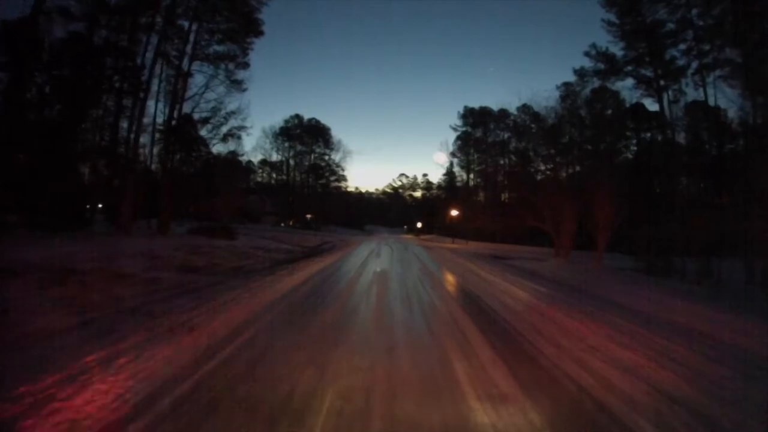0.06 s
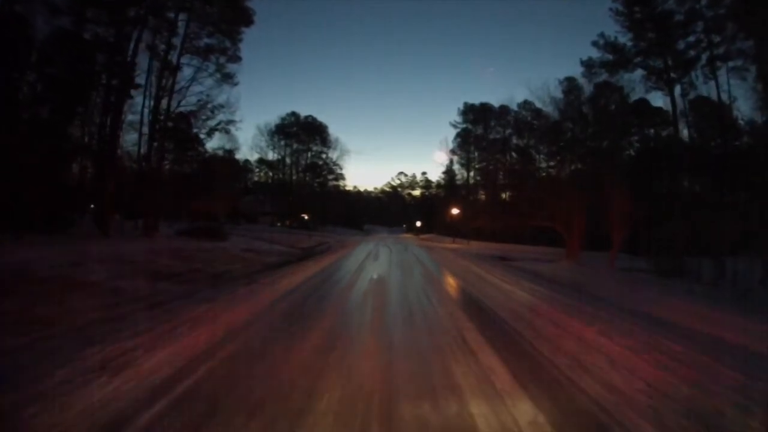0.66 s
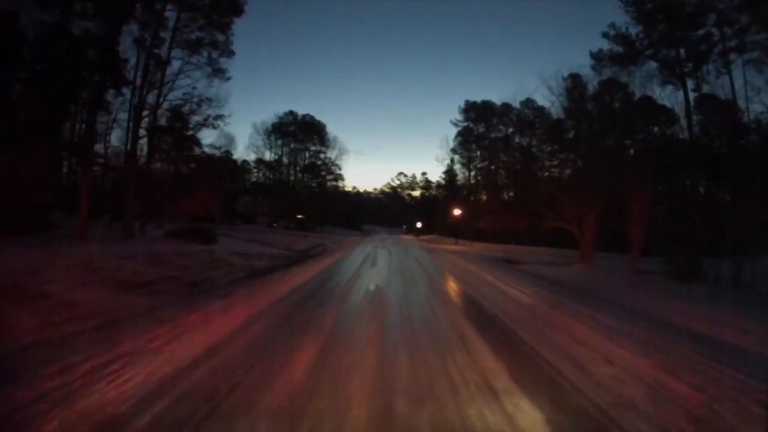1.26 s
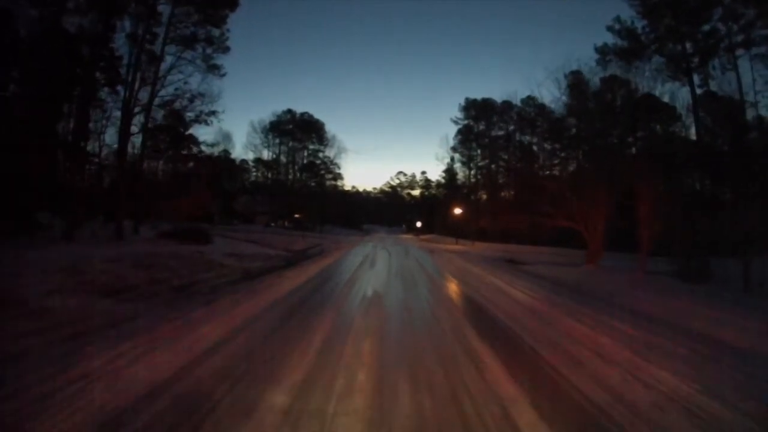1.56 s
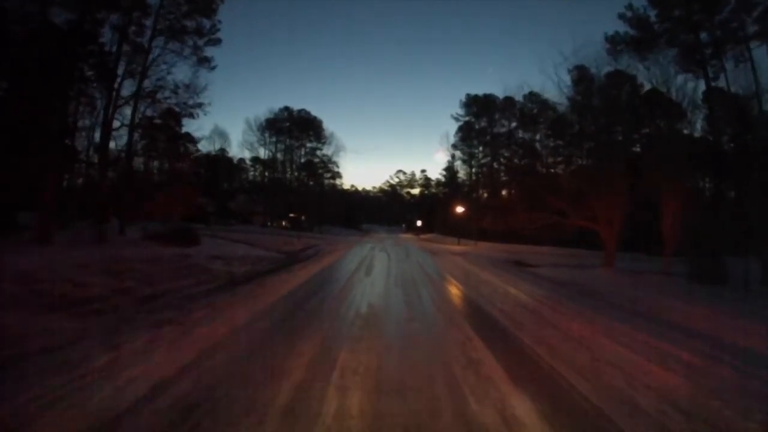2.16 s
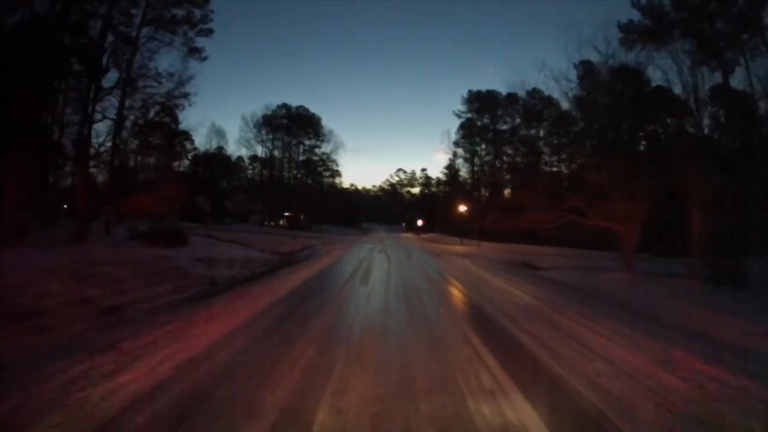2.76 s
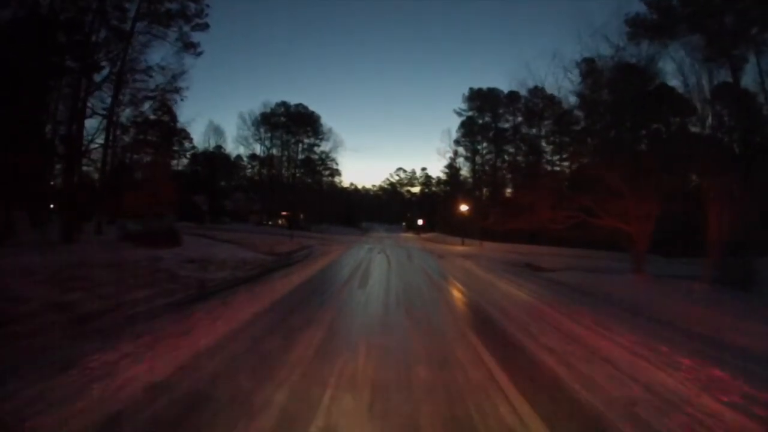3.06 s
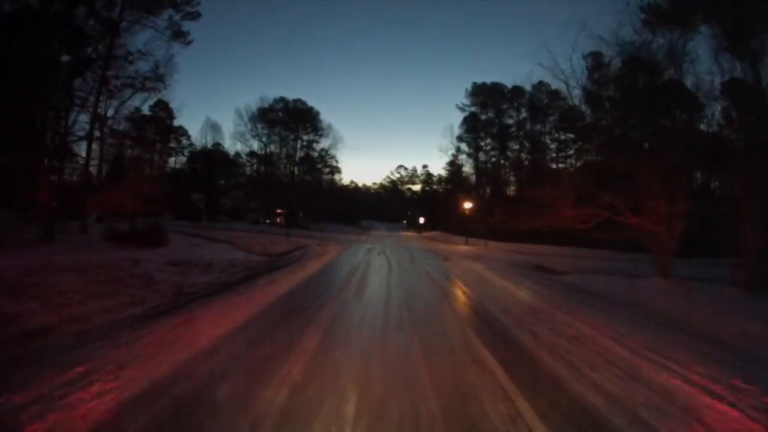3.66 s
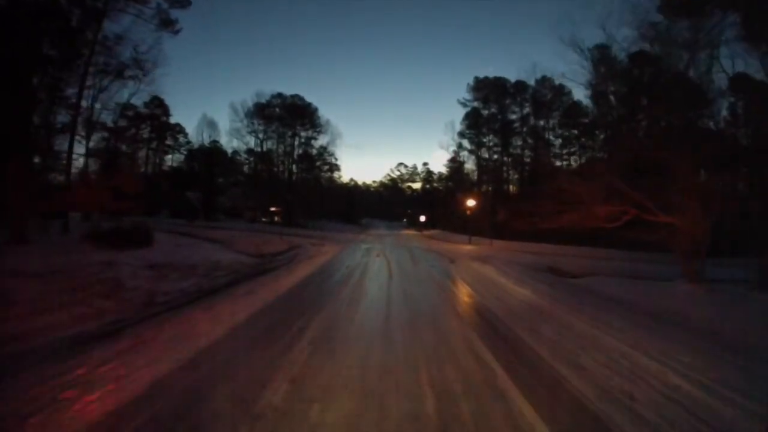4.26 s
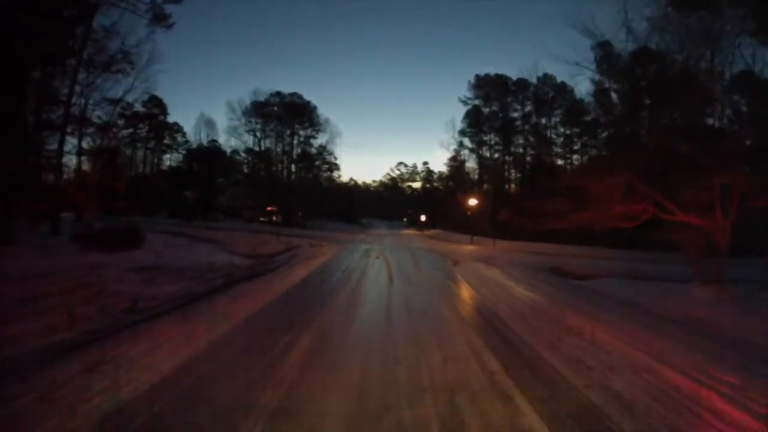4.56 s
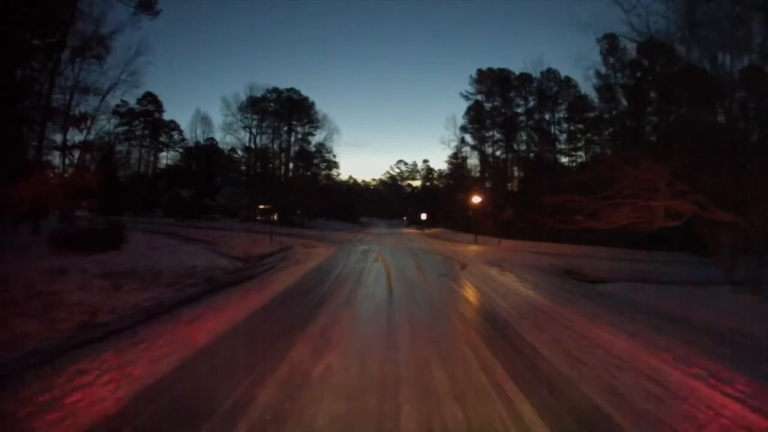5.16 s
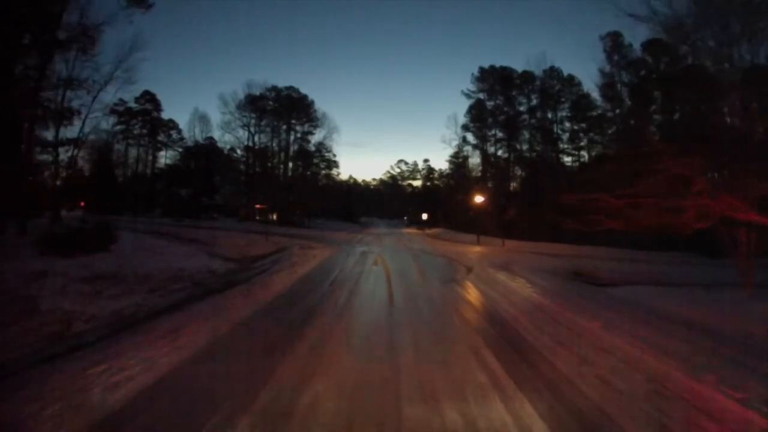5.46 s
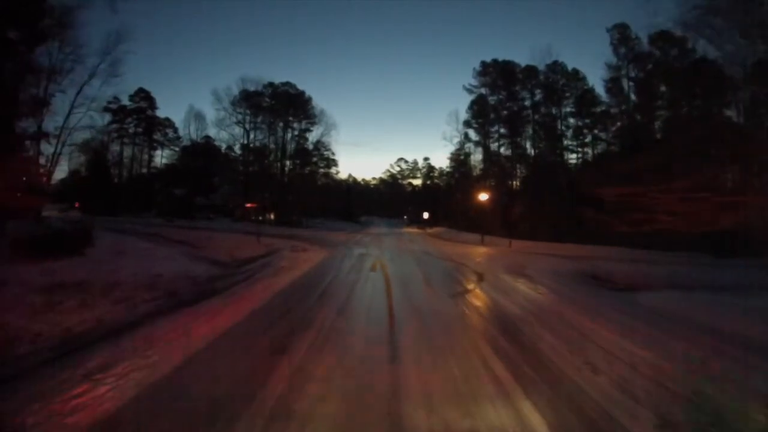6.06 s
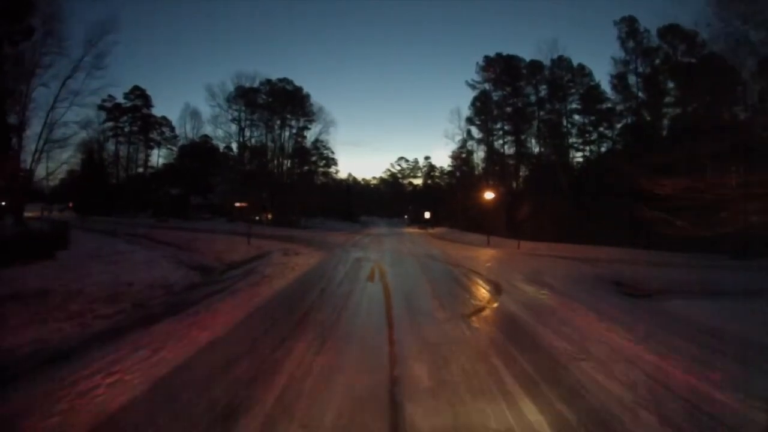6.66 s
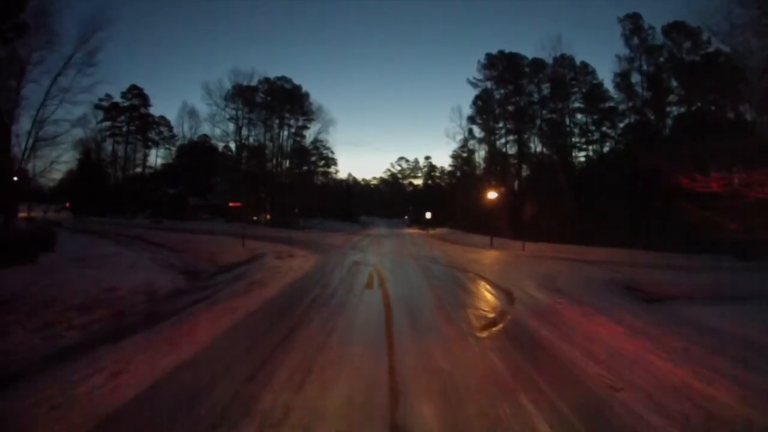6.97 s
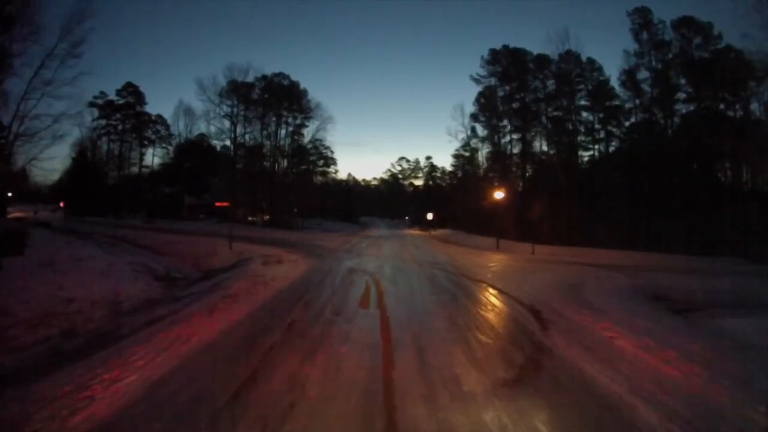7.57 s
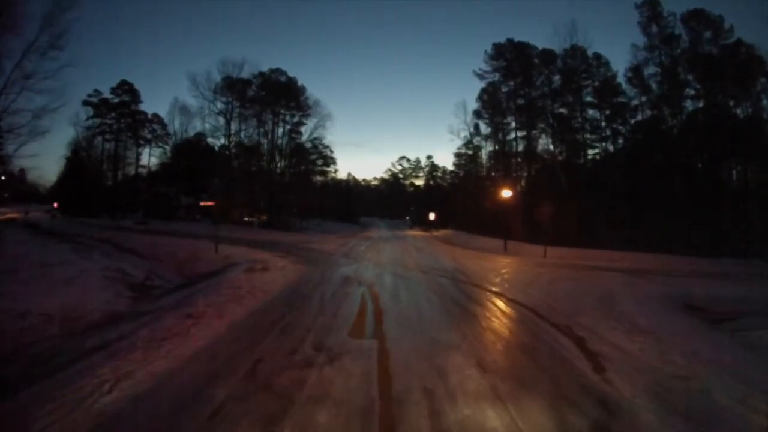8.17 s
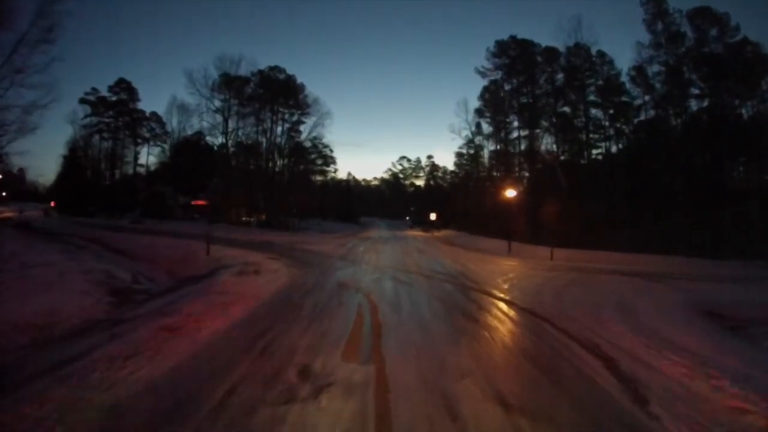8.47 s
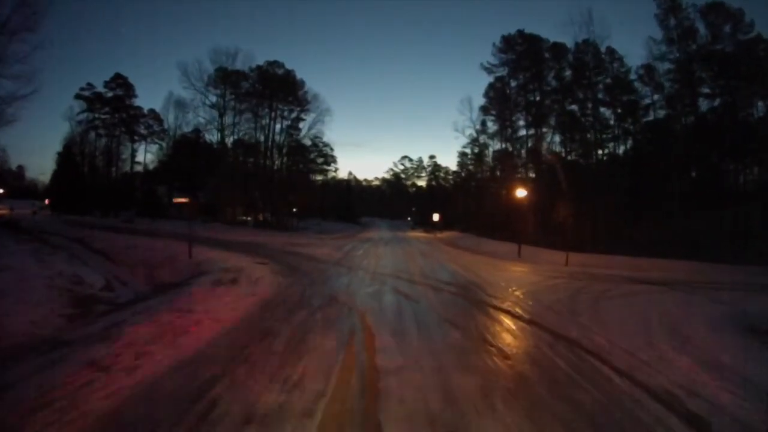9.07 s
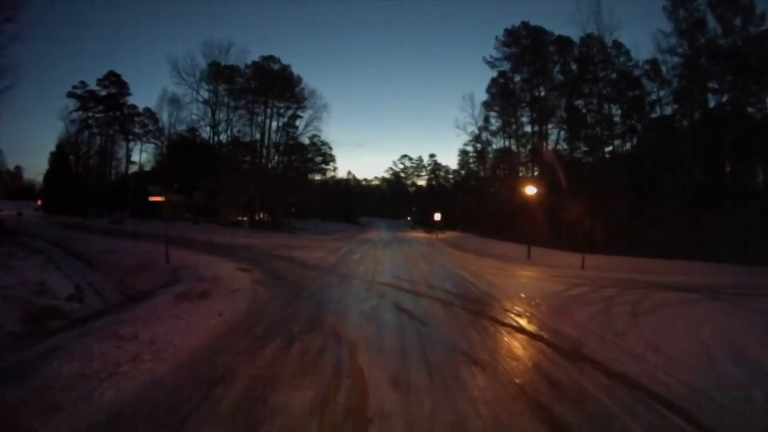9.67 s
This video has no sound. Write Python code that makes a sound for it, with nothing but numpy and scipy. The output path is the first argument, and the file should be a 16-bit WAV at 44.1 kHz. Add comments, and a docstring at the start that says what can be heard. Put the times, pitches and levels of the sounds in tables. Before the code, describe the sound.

A low diesel drone and deep tyre rumble fill a truck cab, heard close to the windscreen as it drives over rutted ice. The engine speed wavers gently, with a faint whine and thin belt squeal behind it. Plastic trim gives a brief squeak early on, then a cluster of squeaks and light metallic clinks past the middle. Loose fittings knock near the end while the rumble carries on.

```python
"""Inside the cab of a diesel fire engine rolling slowly along an icy road.
Six cylinders drone and clatter; the tyres rumble through the cab's resonances and boom in ruts.
The drive belt squeals thinly, a timing gear whines, the turbo whistles faintly.
A low hum fades after about three seconds; a higher one swells briefly now and then.
Bumps make the trim squeak, knock and rattle; slush hisses briefly at a wheel arch."""
import sys
import numpy as np
from scipy import signal
from scipy.fft import rfft, irfft, next_fast_len
from scipy.io import wavfile
from scipy.ndimage import uniform_filter1d

SR = 44100
rng = np.random.default_rng(int(sys.argv[2]) if len(sys.argv) > 2 else 0)


def transcribe(u):
    """Save the signal u as a 16-bit wav file named by the first command-line argument.

    u: samples, shape (n,) or (channels, n), limited to [-1, 1]; the rate is SR.
    q: integer samples, one column per channel.
    """
    v = np.clip(np.atleast_2d(u).T, -1, 1)
    q = np.round(v * 32767).astype(np.int16)
    wavfile.write(sys.argv[1], SR, q)


N = 433041
T = np.arange(N) / SR
HZ = np.maximum(np.arange(N // 2 + 1) * SR / N, 1)
ROAD_RISE_DB = 0.1 * (T - np.mean(T))  # roar and panels slowly grow louder


def undb(db):
    """Decibels to gain."""
    return 10 ** (np.asarray(db) / 20)


def level(x, db):
    """Set the rms level."""
    return x * undb(db) / np.sqrt(np.mean(x ** 2))


def curves(table):
    """Columns of a timed table, one value a sample."""
    times_s, *columns = np.transpose(table)
    return [np.interp(T, times_s, column) for column in columns]


def turns_of(hz):
    """Cycles done so far."""
    return np.cumsum(hz) / SR


def tone(hz):
    """Sine of rms 1 on a moving pitch."""
    return np.sqrt(2) * np.sin(2 * np.pi * turns_of(hz))


def noise():
    """White noise of rms 1."""
    return rng.standard_normal(N)


def walk(rate_hz):
    """Random wander of spread near 1, with rate_hz new values a second."""
    return 1.2 * np.interp(T * rate_hz, np.arange(N // 20), rng.standard_normal(N // 20))


def swell(at_s, sigma_s):
    """Gaussian envelope of peak 1."""
    return np.exp(-np.minimum(((T - at_s) / sigma_s) ** 2 / 2, 50))


def slope(points):
    """Gain over HZ from (Hz, dB) points."""
    hz, db = np.transpose(points)
    return undb(np.interp(np.log(HZ), np.log(hz), db))


def resonances(modes):
    """Gain over HZ from (centre Hz, width Hz, dB) modes."""
    return np.sqrt(sum(undb(db) ** 2 / (1 + ((HZ - hz) / width_hz * 2) ** 2) ** 2
                       for hz, width_hz, db in modes))


def colour(x, gain):
    """Filter by a gain over HZ."""
    size = next_fast_len(N, True)
    bins_hz = np.arange(size // 2 + 1) * SR / size
    return irfft(rfft(x, size) * np.interp(bins_hz, HZ, gain), size)[:N]


def cab_gain(at_hz):
    """Resonances of the cab's air and panels, with dips between them."""
    # Each row: centre in Hz, half width in Hz, lift in dB.
    cab_modes = [(22.57, 2.35, 15), (34.6, 3.1, 8.5), (73.9, 6.5, 12), (152, 11.3, 7), (221, 9.8, 1),
                 (265, 32, 6), (374, 20.5, 7), (543.4, 37.5, 13.5), (632, 18, 6.5), (800, 94, 7),
                 (1145, 13, 7), (1310, 130, 3.5), (1620, 125, 7), (2368, 82, 7), (2670, 180, 7.5),
                 (3003, 74, 8), (3420, 160, 6.5), (4950, 47, 4), (48.8, 5, 8), (199, 13, -5.5),
                 (338, 19, -0.5), (1090, 20, -4), (4390, 220, -5)]
    return undb(sum(db * np.exp(-((at_hz - hz) / width_hz) ** 2) for hz, width_hz, db in cab_modes))


def reflect(x, t60_s, wet_db):
    """Dense early echoes from the cab's glass and walls."""
    t = T[:SR // 5]
    tail = rng.standard_normal(len(t)) * undb(-60 * t / t60_s)
    return x + undb(wet_db) * signal.fftconvolve(x, tail / np.linalg.norm(tail))[:N]


def slush():
    """Fine spray against the wheel arch."""
    # Each row: centre in seconds, sigma in seconds, level in dB.
    splashes = [(4.362, 0.048, -71), (8.295, 0.08, -70)]
    spray = level(colour(noise(), slope([(1000, -20), (3500, 4), (9000, 0), (14000, -10)])), 0)
    return spray * sum(swell(at_s, sigma_s) * undb(db) for at_s, sigma_s, db in splashes)


def panels():
    """The road keeps two thin panels singing at a wavering pitch."""
    # Each row: pitch in Hz, waver in Hz, mean level in dB.
    modes = [(553, 15, -58), (644, 4.08, -62)]
    singing = sum(tone(hz + waver_hz * walk(18)) * undb(db + 2 * walk(12)) for hz, waver_hz, db in modes)
    return singing * undb(ROAD_RISE_DB)


def hum_swells():
    """Brief swells of the cab's hum near 550 Hz."""
    # Each row: centre in seconds, level in dB.
    peaks = [(.1, -44), (.187, -41), (.27, -43), (.629, -44), (.977, -40), (1.243, -42.5), (1.378, -39),
             (5.383, -38), (6.264, -39), (7.065, -42), (9.048, -36.5), (9.306, -43)]
    return tone(552 + 12 * walk(60)) * sum(swell(at_s, sigma_s=0.013) * undb(db) for at_s, db in peaks)


def tick():
    """A light, bright tick of plastic."""
    # Each row: start in seconds, level in dB.
    contacts = [(5.775, -57)]
    decay_s = 0.0094
    crack = level(colour(noise(), slope([(2500, -25), (4800, 5), (9000, -2), (14000, -17)])), 0)
    return crack * sum(undb(db) * (T > at_s) * np.exp(-np.abs(T - at_s) / decay_s)
                       for at_s, db in contacts)


def rattles():
    """Broken ice jolts the lining into short clusters of tiny contacts."""
    # Each row: centre in seconds, sigma in seconds, level in dB, treble-to-bass tilt in dB.
    jolts = [(0.077, 0.011, -50.5, 0), (0.178, 0.016, -50.5, 2), (0.249, 0.014, -54, -6),
             (2.313, .012, -53, 10), (6.854, 0.031, -60, 0), (6.937, 0.014, -51, 0), (7.04, .025, -69, -5),
             (7.512, 0.0053, -47.5, 1), (7.87, .007, -49.5, 1), (7.903, 0.0074, -51.5, 0),
             (8.285, .01, -52.5, 7), (8.353, 0.032, -55, 5), (8.908, 0.0049, -52, 3),
             (8.946, 0.0087, -56, 9), (9.08, 0.02, -55, 2), (9.199, 0.0057, -49, 1),
             (9.269, 0.0046, -55, 2)]
    # Each row: centre in Hz, width in Hz, gain in dB.
    lining_modes = [(800, 320, -2), (1340, 500, 1.5), (1710, 350, -8), (2500, 830, -4.5), (3350, 480, -3.5)]
    contacts = noise() * undb(3 * walk(500))
    ring = resonances(lining_modes)
    low, high = (level(colour(contacts, ring * side), 0) for side in (HZ < 2100, HZ >= 2100))
    return sum(swell(at_s, sigma_s) * undb(db) * (low * undb(-tilt_db / 2) + high * undb(tilt_db / 2 - 8))
               for at_s, sigma_s, db, tilt_db in jolts)


def struck(blows, modes):
    """A loose part strikes and bounces once; hard contacts and the bounce favour higher modes."""
    bounce_s, attack_s = 0.013, 0.002
    t, out = T[:SR // 6], np.zeros(N + SR)
    for at_s, blow_db, hardness_db_per_oct, bounce_db in blows:
        strike = (0, blow_db - 2, hardness_db_per_oct)
        bounce = (bounce_s, blow_db + bounce_db, hardness_db_per_oct + 4)
        for delay_s, peak_db, tilt_db_per_oct in (strike, bounce):
            ring = 0
            for hz, t60_s, db in modes:
                mode_db = db + tilt_db_per_oct * np.log2(hz / 1000) + rng.standard_normal()
                ring = ring + undb(mode_db - 60 * t / t60_s) * np.sin(2 * np.pi * hz * t)
            ring = ring * (1 - np.exp(-t / attack_s))
            start = int((at_s + delay_s) * SR)
            out[start:start + len(t)] += undb(peak_db) * ring / np.abs(ring).max()
    return out[:N]


def clinks():
    """A metal latch strikes and rings."""
    # Each row: start in seconds, level in dB, hardness in dB per octave, bounce in relative dB.
    blows = [(6.716, -43, 1, -3), (6.733, -38, 1, -3), (7.194, -48, 2, -5)]
    # Each row: pitch in Hz, t60 in seconds, gain in dB.
    latch_modes = [(1690, .08, -7), (2525, .09, -7), (3020, .04, 0), (3435, .05, -1), (3779, .04, -6),
                   (4974, .06, -14)]
    return struck(blows, latch_modes)


def knocks():
    """Loose fittings knock with a short, low ring."""
    # Each row: start in seconds, level in dB, hardness in dB per octave, bounce in relative dB.
    blows = [(3.165, -35, -4, -12), (3.824, -35, -8, -8), (3.857, -36, -4, -14), (8.751, -24.5, -1, -12),
             (8.851, -36, -8, -14), (9.487, -32, -1.5, -9), (9.59, -35.5, -8, -14)]
    # Each row: pitch in Hz, t60 in seconds, gain in dB.
    fitting_modes = [(434, .05, -3), (615, .028, 6), (780, .03, -4), (1380, .02, -12), (1690, .025, -9),
                     (2430, .02, -15), (2690, .022, -4), (2900, .02, -8), (3320, .015, -11)]
    return struck(blows, fitting_modes)


def squeaks():
    """Trim slips against trim: a wavering tone inside a gritty scrape."""
    # Each row: time in seconds, time stretch, pitch in Hz, tone in dB, scrape in dB.
    slips = [(.178, .6, 3480, -54, -68), (1.897, 1.0, 3053, -43, -54.5), (2.305, 1.2, 3054, -55, -62),
             (6.711, .7, 2990, -55, -64), (6.724, 1.3, 1748, -50, -66), (6.735, .9, 3050, -46, -50.5),
             (6.778, 1.7, 1570, -54, -67), (6.82, 2.5, 5600, -68, -71), (6.85, 3.5, 2480, -64, -74),
             (6.95, 2.4, 5710, -66.5, -65), (7.184, .7, 3100, -55, -65), (7.206, 1.0, 3090, -58, -59),
             (7.252, 1.6, 3105, -62, -82), (7.292, 2.1, 3070, -53.5, -79)]
    # One slip: low catch, squeak, thin upper ring, high release.
    # Each row: delay in seconds, sigma in seconds, pitch ratio, tone and scrape in relative dB.
    stages = [(-.013, .007, .573, -12, -7), (0, .007, 1, 0, -2), (-.002, .004, 1.69, -17, -12),
              (.014, .01, 1.294, -18.5, -1)]
    # Each row: centre in Hz, width in Hz, gain in dB.
    trim_modes = [(1660, 250, 21), (2570, 150, 5.5), (3050, 230, 20), (3520, 300, 12), (3870, 280, 13),
                  (4950, 440, 6.5), (6300, 6000, 0), (9650, 6200, -7)]
    grit = undb(2.5 * walk(700))
    scrape = level(colour(noise() * grit, resonances(trim_modes)), 0)
    wavering_s = turns_of(1 + 0.007 * walk(250))
    out = np.zeros(N)
    for at_s, stretch, hz, tone_db, scrape_db in slips:
        for delay_s, sigma_s, ratio, stage_tone_db, stage_scrape_db in stages:
            envelope = swell(at_s + stretch * delay_s, stretch * sigma_s)
            on = envelope > 1e-4
            squeal = np.sqrt(2) * np.sin(2 * np.pi * hz * ratio * wavering_s[on])
            rub = undb(tone_db + stage_tone_db) * squeal + undb(scrape_db + stage_scrape_db) * scrape[on]
            out[on] += envelope[on] * rub
    return out


def turbo():
    """A thin blade whistle grows with turbo speed and flares now and then."""
    # Each row: time in seconds, blade tone in Hz.
    blade_track = [(0, 9300), (1.1, 9600), (2.0, 9200), (2.6, 9050), (3.25, 8990), (3.95, 8200),
                   (4.4, 8110), (4.95, 8590), (5.45, 8800), (5.85, 8650), (6.4, 8280), (7.2, 7950),
                   (8.25, 8350), (9.82, 7600)]
    # Each row: centre in seconds, sigma in seconds, lift in dB.
    flares = [(.7, .12, 5), (2.065, .03, 14), (2.4, .04, 9), (5.45, .3, 7)]
    blade_hz, = curves(blade_track)
    flare_db = sum(db * swell(at_s, sigma_s) for at_s, sigma_s, db in flares)
    whistle_db = -88 + 0.002 * (blade_hz - np.mean(blade_hz)) + flare_db
    return tone(blade_hz + 22 * walk(120)) * undb(whistle_db + 3 * walk(14))


def belt(crank_hz):
    """A thin, rough squeal swings in pitch twice a lap of the belt and rings the pulleys."""
    # Each row: share of the lap, pitch in Hz, relative level in dB.
    lap_track = [(0, 7720, 3), (.15, 7540, -1), (.27, 7200, 0), (.4, 6830, 3), (.52, 7400, -4),
                 (.63, 7620, -6), (.8, 7020, 1), (.9, 7560, -1), (1, 7720, 3)]
    # Each row: centre in Hz, width in Hz, gain in dB.
    pulley_modes = [(6810, 70, -8), (6945, 60, -2), (7030, 45, -5), (7185, 60, 1), (7267, 60, 2),
                    (7345, 45, 1), (7467, 50, -1), (7666, 80, 0), (7745, 50, -3), (7350, 1100, -8)]
    lap = (turns_of(0.6 * crank_hz) + 0.3 + 0.025 * walk(20)) % 1
    share, hz, db = np.transpose(lap_track)
    squeal_hz = np.interp(lap, share, hz) + 240 * walk(1200)
    squeal = tone(squeal_hz) * undb(np.interp(lap, share, db) + walk(200))
    ring = resonances(pulley_modes)
    chirps = level(colour(squeal, ring), 0)
    friction = level(colour(noise(), ring), -3)
    return level(chirps + friction, -64.5)


def timing_gear(crank_hz):
    """Meshing teeth ring the housing, which lifts the whine and pulls it towards its own pitch."""
    teeth, housing_hz, width_hz, fall_db_per_s = 41, 786, 20, 0.45
    mesh_hz = teeth * crank_hz
    response = 1 / np.hypot(1, 2 * (mesh_hz - housing_hz) / width_hz)
    whine_hz = mesh_hz + np.sqrt(response) * (housing_hz - mesh_hz) + 2.5 * walk(30)
    return tone(whine_hz) * response * undb(-57 - fall_db_per_s * T + 1.5 * walk(13))


def low_hum():
    """A hum near 275 Hz, strong for about three seconds, then faint."""
    # Each row: time in seconds, pitch in Hz, level in dB.
    hum_track = [(0, 276.4, -49), (1.1, 278.4, -46), (2, 276.6, -47), (3.2, 274.7, -49.5),
                 (3.55, 273.8, -59.5), (9.82, 259.7, -65)]
    hum_hz, hum_db = curves(hum_track)
    return tone(hum_hz) * undb(hum_db + 0.3 * walk(25))


def damp(x, window_s):
    """Dampers even out the slow swelling of a resonant motion."""
    power = uniform_filter1d(x ** 2, int(window_s * SR))
    return x * np.sqrt(np.mean(power) / (power + 0.02 * np.mean(power)))


def surface(crank_hz):
    """Road band gains in dB: a rut booms at once, the cab rocks on its mounts a little later."""
    # Each row: time in seconds, boom lift in dB, rocking lift in dB, roar and crunch lift in dB.
    ruts = [(.17, 8, 6.5, 1), (.68, 3, -3, 1.5), (1.32, 6, 3, 0), (1.92, 1.5, 8, -0.5), (2.18, 8.5, 3, 0.5),
            (3.25, 4, 7, -0.5), (4.1, 0, 6, -1), (5.25, 6, -2, 0), (5.87, 6, 6.5, -0.5),
            (6.28, 8.5, 5.5, -0.5), (6.75, 10, 2, 0.5), (7.15, 0, 1, 0), (7.62, 2.5, 1, 0),
            (8.3, 6.5, 7.5, -0.5), (8.95, 8, -1.5, -0.5), (9.221, 5.5, 1, -2), (9.76, 6, -17, -1.5)]
    rock_lag_s = 0.22
    speed_db = -0.1 * (crank_hz - np.mean(crank_hz))  # slightly quieter at high revs
    rut_db = sum(db * swell(at_s, 0.2) for at_s, _, _, db in ruts)
    bounce_db = sum(db * swell(at_s + rock_lag_s, 0.085) for at_s, _, db, _ in ruts)
    boom_db = -3.5 + sum(db * swell(at_s, 0.094) for at_s, db, _, _ in ruts)
    roar_db = 0.4 + speed_db + rut_db + ROAD_RISE_DB + walk(8)
    crunch_db = -0.78 + speed_db + rut_db
    return bounce_db, boom_db, roar_db, crunch_db


def road(crank_hz):
    """Tyres on rutted ice: the cab bounces, booms and roars; the roar throbs with the firings."""
    # Tyre noise entering the cab. Each row: frequency in Hz, relative density in dB.
    tyre_spectrum = [(12.0, -17.5), (18.0, -0.5), (45.0, -7), (90.0, -2.3), (125.0, -14), (200.0, -20.5),
                     (330.0, -25.5), (700.0, -34), (1050.0, -43), (2000.0, -47), (4200.0, -50),
                     (6500.0, -55), (9000.0, -62), (15000.0, -67.5)]
    bounce_db, boom_db, roar_db, crunch_db = surface(crank_hz)
    tread = noise()
    gain = level(slope(tyre_spectrum) * cab_gain(HZ), -29)
    lowpasses = [1 / (1 + (HZ / edge_hz) ** 8) for edge_hz in (48, 130, 1000, 4200)]
    below_edges = [colour(tread, gain * lowpass) for lowpass in lowpasses + [1]]
    bounce, boom, roar, crunch, hiss = np.diff([np.zeros(N)] + below_edges, axis=0)
    rocking = tone(22.2 + 0.7 * walk(3))
    bounce = undb(-2) * bounce + undb(-35.5) * rocking
    throb_db = 1.5 * np.cos(2 * np.pi * turns_of(3 * crank_hz))
    lows = damp(bounce, 0.53) * undb(bounce_db) + damp(boom, 0.14) * undb(boom_db)
    highs = crunch * undb(crunch_db + 0.84 * walk(35)) + hiss * undb(0.32 * crunch_db)
    return lows + roar * undb(roar_db + throb_db) + highs


def diesel_knock(crank_hz):
    """Each firing rings the block; unequal cylinders make the clatter lope once every two turns."""
    # Relative knock in dB of the six cylinders, in firing order.
    cylinders_db = [-5.5, -6, -3, 0, -2, -5.5]
    # Each row: centre in Hz, width in Hz, gain in dB.
    block_modes = [(1178, 30, 4), (1281, 96, 2), (1400, 104, -3), (1622, 48, -5), (1720, 56, -2),
                   (2430, 330, -10.5), (3520, 160, -12.5)]
    decay_s, lag_firings = 0.016, 0.75
    firings = 3 * turns_of(crank_hz) - lag_firings
    cylinder = (np.floor(firings).astype(int) + 1) % len(cylinders_db)
    since_firing_s = (firings % 1) / (3 * crank_hz)
    blows = undb(cylinders_db)[cylinder] * np.exp(-since_firing_s / decay_s)
    return level(colour(noise() * blows, resonances(block_modes)), -60)


def engine(crank_hz):
    """Three firings a turn drone; unequal cylinders add half orders that swell at cab resonances."""
    # Firing tone. Each row: time in seconds, level in dB.
    drone_track = [(0, -33), (.5, -37), (1.45, -32), (2.1, -35), (2.9, -32.5), (3.27, -41.5), (3.85, -31),
                   (4.22, -29.5), (4.5, -42), (5.2, -31), (5.9, -33), (6.2, -40), (6.9, -37.5), (7.3, -39),
                   (7.7, -35.5), (8.85, -36.5), (9.15, -31.5), (9.82, -34.5)]
    # Each row: multiple of crank speed, level entering the cab in dB.
    strong_orders = [(4, -48.5), (5.5, -54), (6.5, -51), (7, -54), (7.5, -57), (8, -47.3), (8.5, -53.5),
                     (9, -53.5), (12, -63), (15, -68), (18, -64.5), (19.5, -70), (22.5, -69), (25, -72),
                     (33, -75), (37.5, -75)]
    # Dense weak orders. Each row: frequency in Hz, relative level in dB.
    block_spectrum = [(20, -3), (100, -29), (160, 1.5), (200, 3.5), (300, -5.5), (550, -8), (800, -12.5),
                      (1400, -22), (2500, -29.5)]
    turns = turns_of(crank_hz * (1 + 0.001 * walk(14)))
    drone_db, = curves(drone_track)
    drone = tone(3 * crank_hz) * undb(drone_db + 0.64 * walk(7.7))
    # the throttle is open when the engine runs fast or speeds up
    climb_hz_per_s = uniform_filter1d(np.gradient(crank_hz) * SR, SR // 3)
    throttle_db = crank_hz - np.mean(crank_hz) + 0.093 * climb_hz_per_s
    orders = 0
    for order, db in strong_orders:
        lift = np.interp(T, T[::200], cab_gain(order * crank_hz[::200]))
        gain = lift * undb(db + 0.6 * walk(5))
        orders = orders + gain * np.sin(2 * np.pi * (order * turns + rng.random()))
    # each cylinder shakes the block in its own way, so the pattern repeats every two turns
    pattern = irfft(np.exp(2j * np.pi * rng.random(256)), 4096)
    shake = np.interp(turns / 2 % 1, np.linspace(0, 1, len(pattern)), pattern)
    block = level(colour(shake * (1 + 0.17 * walk(40)), slope(block_spectrum) * cab_gain(HZ)), -48)
    return drone + (np.sqrt(2) * orders + block) * undb(throttle_db)


def scene():
    """Engine, road and trim as heard at the windscreen, in mono."""
    # Each row: time in seconds, crankshaft speed in turns per second.
    crank_track = [(0.0, 19.22), (0.5, 19.55), (1.0, 19.78), (1.7, 19.08), (2.6, 19.2), (3.25, 19.07),
                   (3.8, 17.47), (4.3, 18.28), (4.8, 19.67), (5.5, 19.37), (6.1, 18.57), (6.6, 18.45),
                   (7.1, 18.48), (7.8, 19.34), (8.25, 19.52), (8.9, 17.93), (9.4, 17.16), (9.82, 16.85)]
    crank_hz, = curves(crank_track)
    motor = engine(crank_hz) + diesel_knock(crank_hz)
    whines = timing_gear(crank_hz) + belt(crank_hz) + low_hum() + turbo()
    trim = reflect(squeaks() + knocks() + clinks() + rattles() + tick(), t60_s=0.08, wet_db=-11)
    return (motor + whines + road(crank_hz) + slush() + trim + panels() + hum_swells())[None]


def record(dry):
    """Short fades at both ends and a steep treble cut."""
    fade_s, top_hz = 0.004, 15100
    fade = np.minimum(np.minimum(T, T[-1] - T) / fade_s, 1)
    return signal.sosfilt(signal.ellip(10, 0.2, 80, top_hz, fs=SR, output="sos"), dry * fade)


dry = scene()
out = record(dry)
transcribe(out)
```